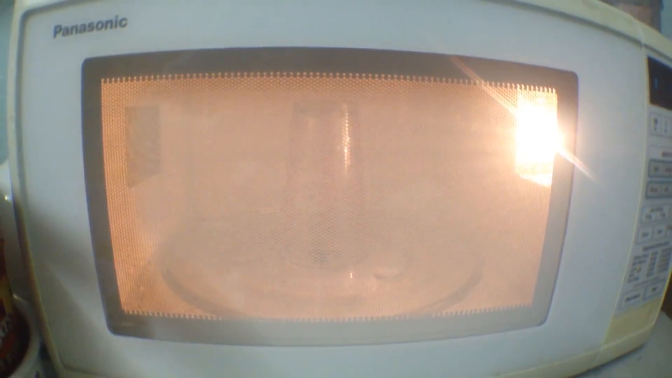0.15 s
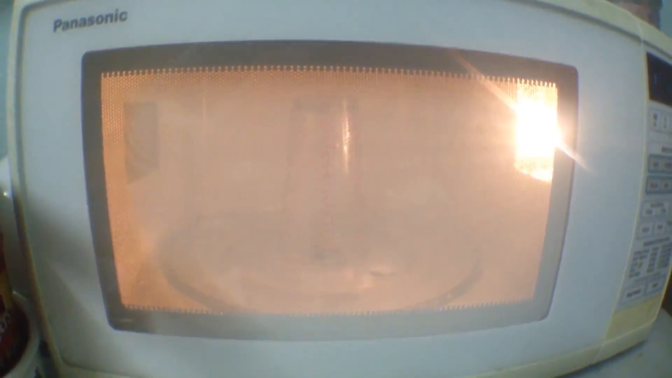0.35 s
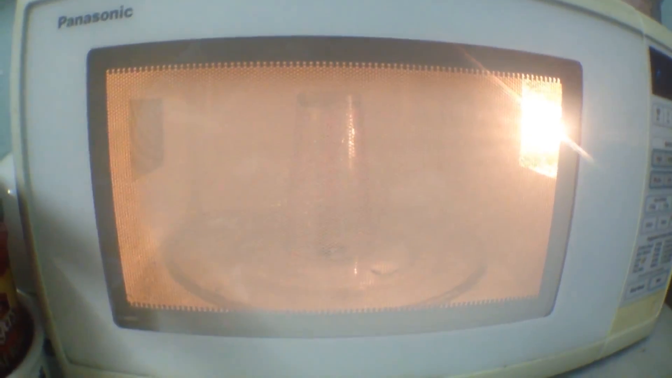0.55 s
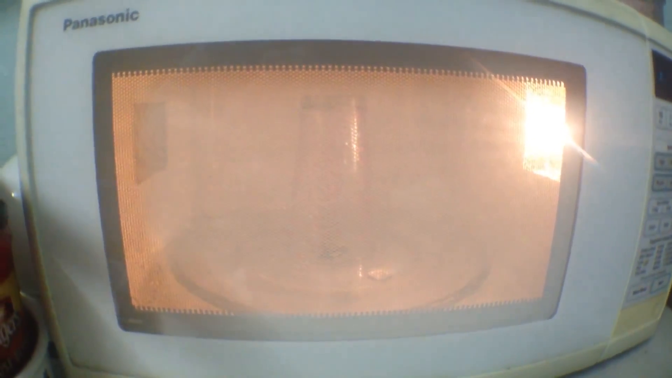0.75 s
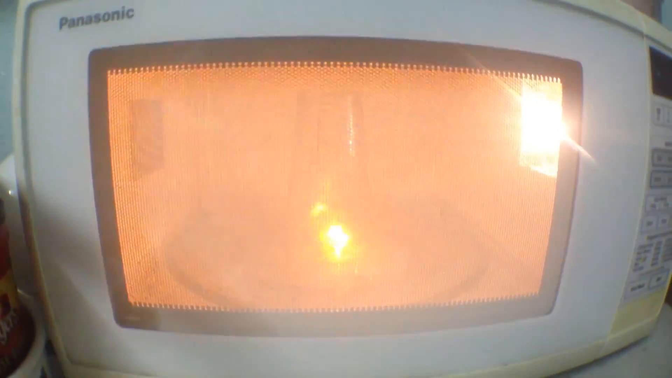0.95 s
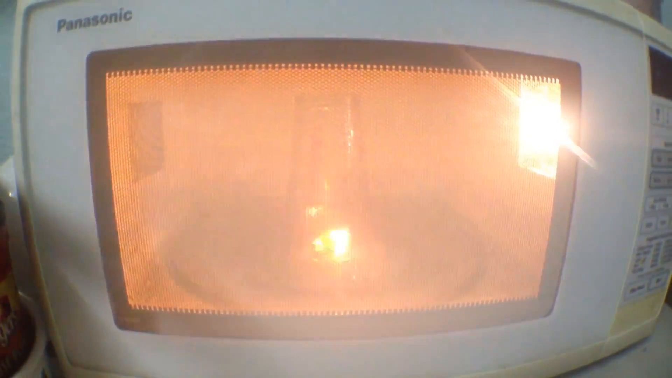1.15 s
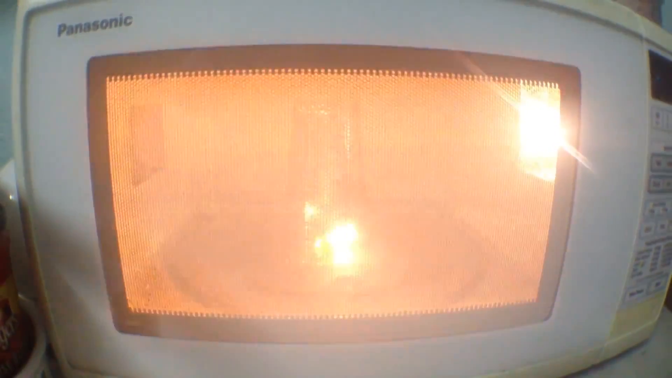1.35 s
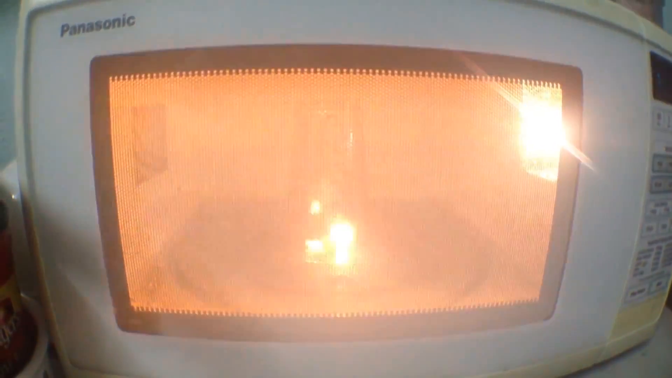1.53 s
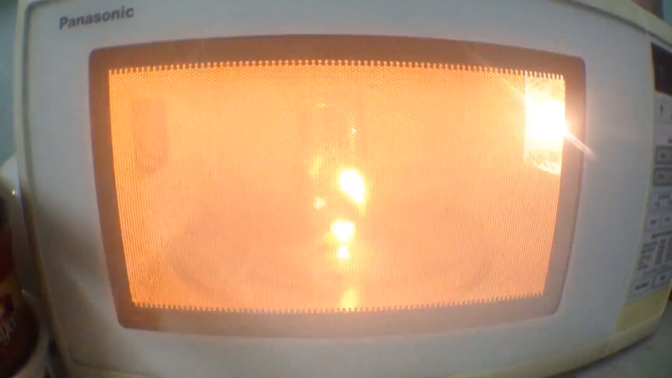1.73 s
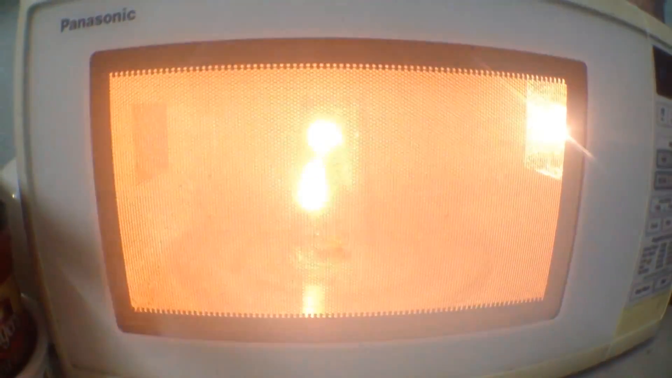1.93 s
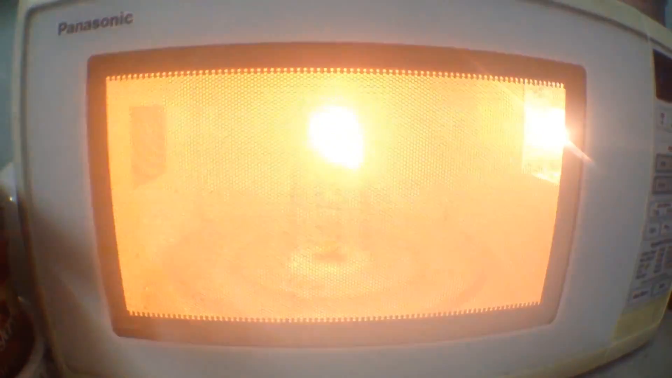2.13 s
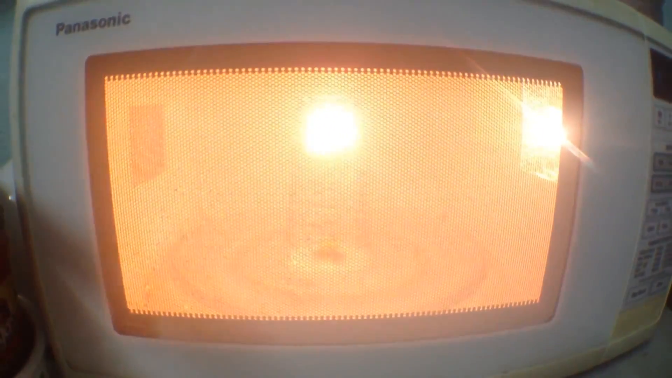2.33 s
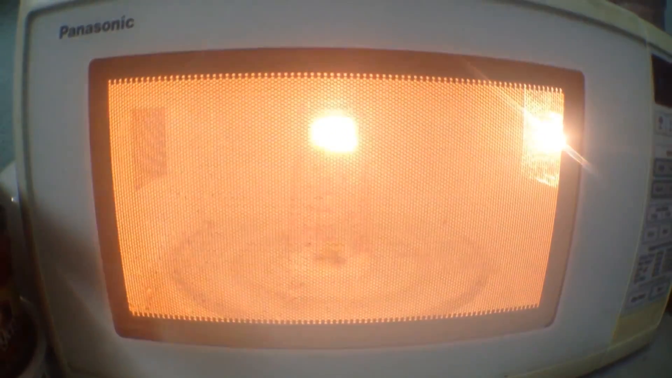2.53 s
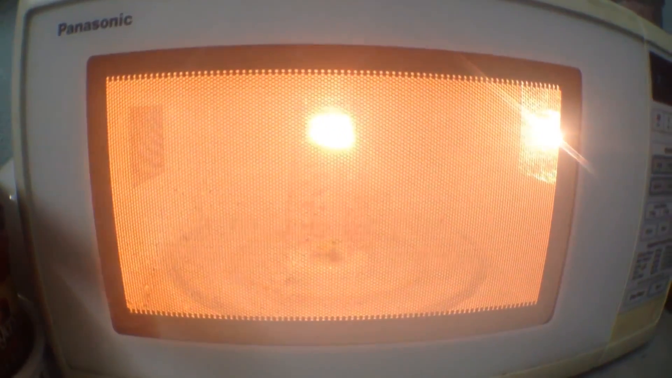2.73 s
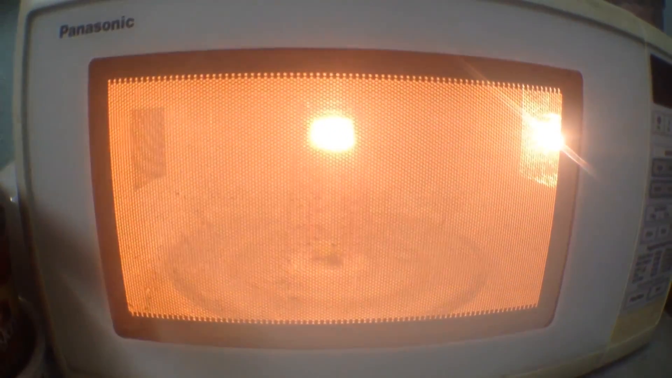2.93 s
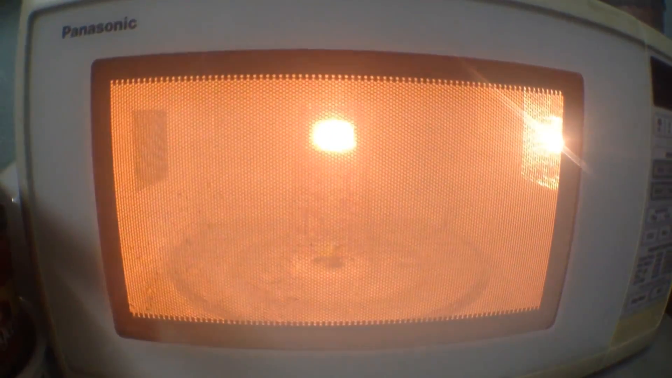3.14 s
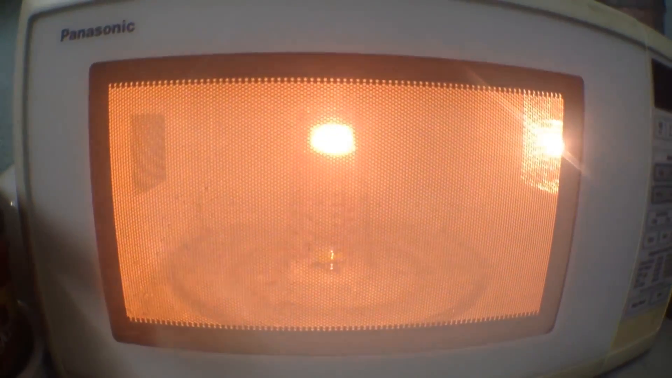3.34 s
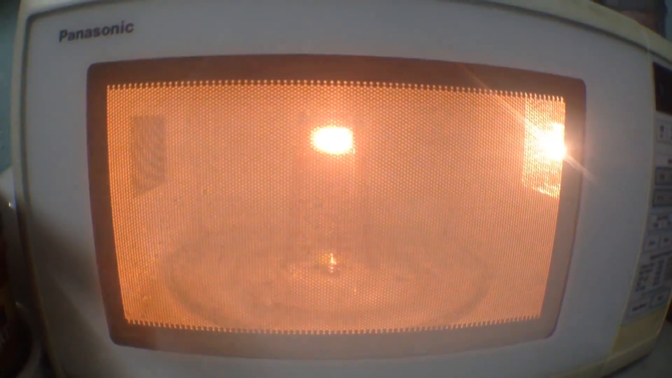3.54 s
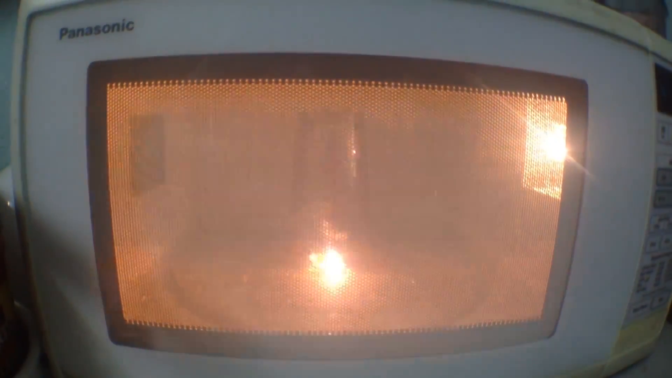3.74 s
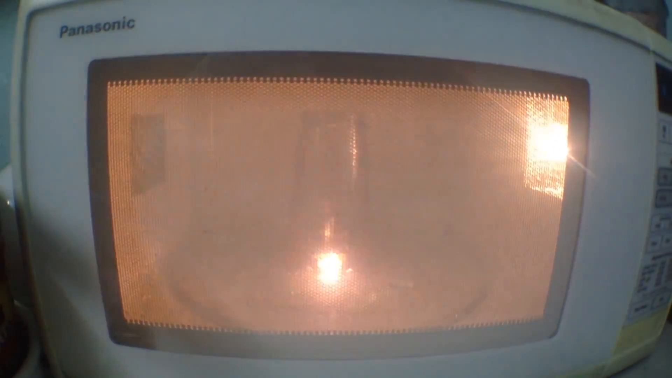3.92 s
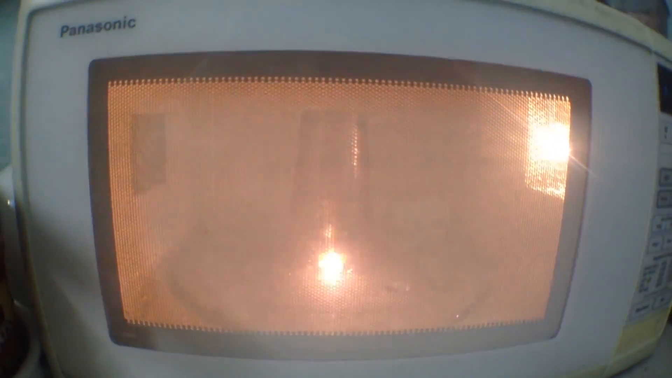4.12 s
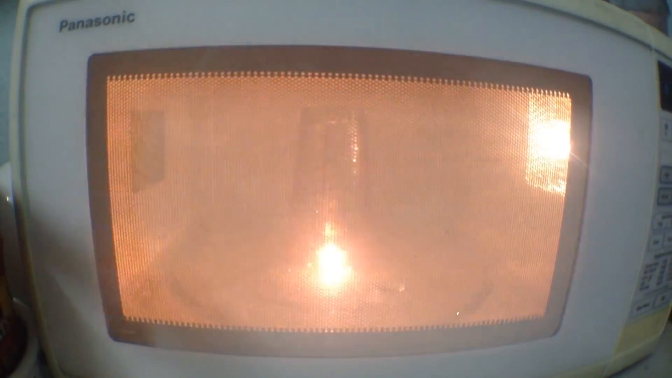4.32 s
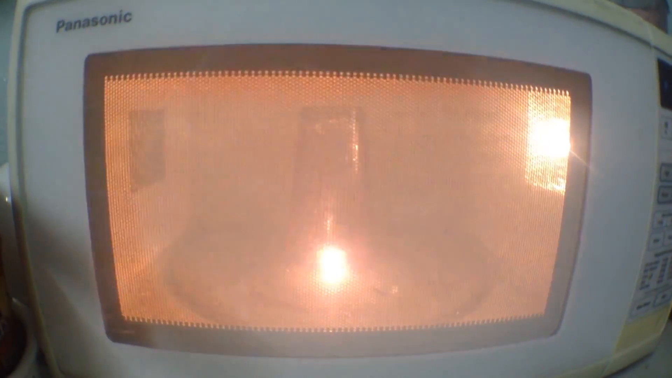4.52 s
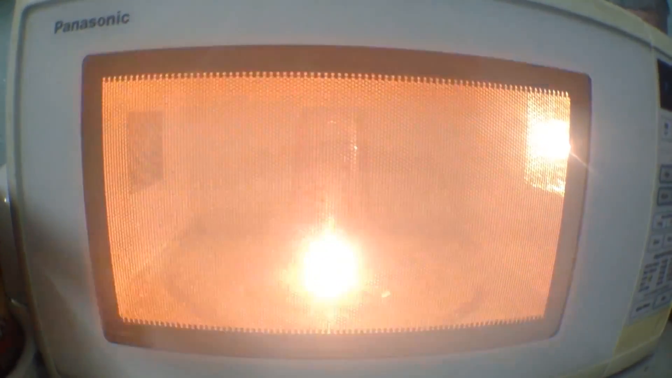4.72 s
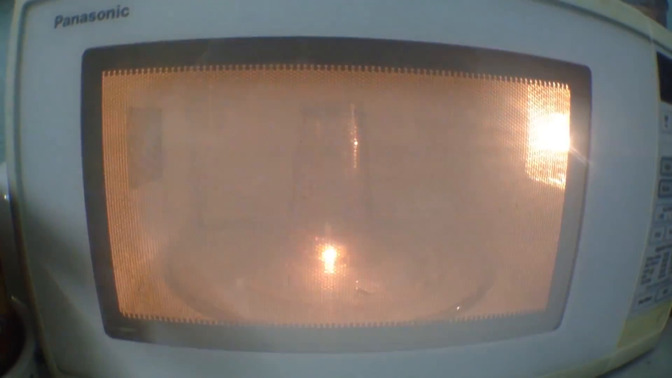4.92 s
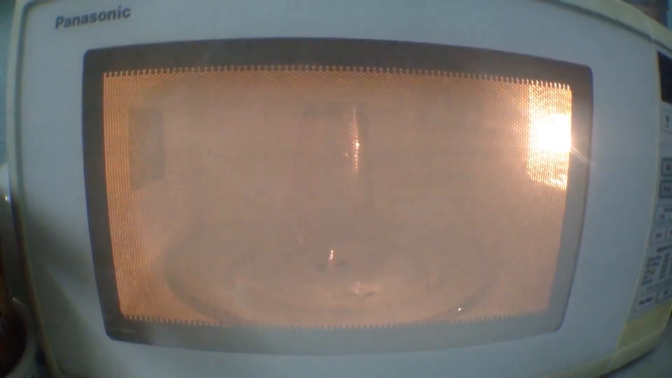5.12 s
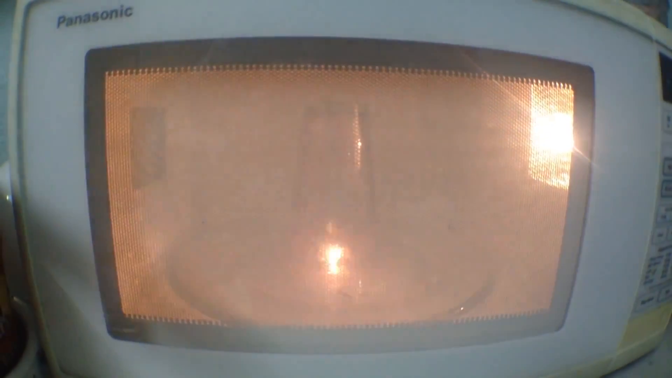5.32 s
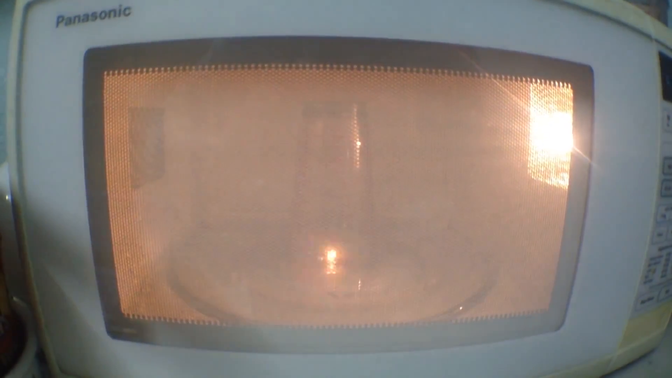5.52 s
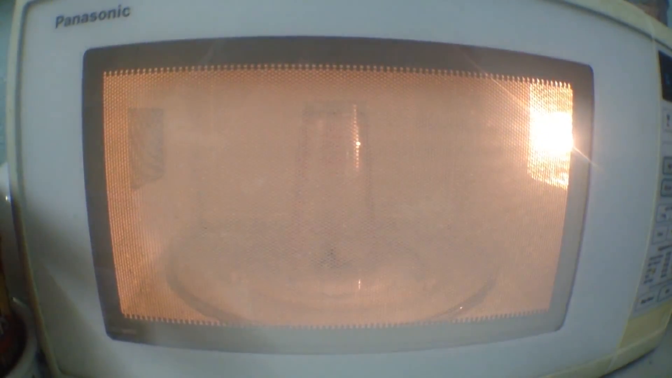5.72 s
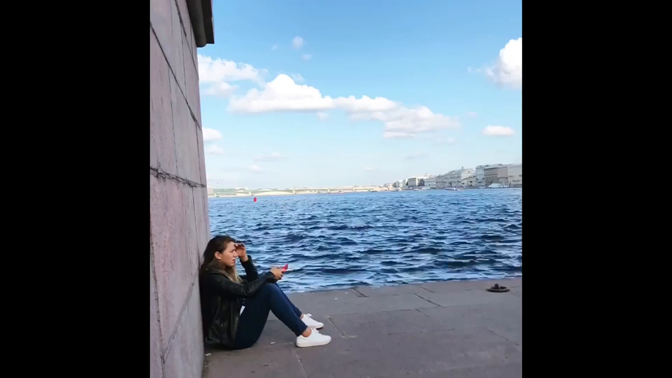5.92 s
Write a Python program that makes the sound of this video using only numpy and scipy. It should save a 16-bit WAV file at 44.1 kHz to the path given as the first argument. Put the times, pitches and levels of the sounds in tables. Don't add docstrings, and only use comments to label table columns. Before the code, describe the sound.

Close to a running microwave oven in a kitchen: low steady hum and fan air. Fruit inside sizzles faintly with two tiny pops, then a violent sputtering electric arc roars for over a second, ringing metal and glass. Hum alone returns, a second ragged arc burst follows, then hum again. An abrupt cut, a tiny silence, and low wind rumble by water ends it. Small camera microphone, slightly overloaded.

```python
import sys
import numpy as np
from scipy import signal
from scipy.fft import rfft, irfft
from scipy.io import wavfile
from scipy.ndimage import uniform_filter1d

SR = 44100
rng = np.random.default_rng(int(sys.argv[2]) if len(sys.argv) > 2 else 0)


def natural_amplitude(level_db):
    exponent = np.asarray(level_db, float) / 20
    return 10 ** exponent


def inscribe(sig):
    pcm = np.round(np.clip(np.atleast_2d(sig).T, -1, 1) * 32767)
    wavfile.write(sys.argv[1], SR, pcm.astype(np.int16))


N = 267422
T = np.arange(N) / SR

# (frequency [Hz], density [dB/Hz])
AIR_SPECTRUM = [(18, -76), (30, -47), (96, -21), (138, -9.5), (171, -10.5), (246, -15), (339, -7),
                (399, -11), (660, -12), (735, -18), (1190, -22), (1460, -15), (2200, -26.5), (2860, -45),
                (4840, -120)]
# (frequency [Hz], density [dB/Hz])
HISS_SPECTRUM = [(1700, -16), (2100, -27), (2550, -2), (3000, 2), (4450, 4), (5200, -7), (6600, -6.5),
                 (8600, -12), (9500, -22.5), (10600, -21), (11300, -16), (15000, -16)]
# (frequency [Hz], level re blade tone [dB], waver [dB])
TONES = [(168.3, 0, 1.2), (200, -3, 1.2), (336.6, -5, 2), (399, -17, 1.5)]
# (frequency [Hz], level re blade tone [dB], waver [dB])
CORE_TONE = (800.4, -15, 1.2)
# (time [s], level [dB], decay time [s])
JUICE_PUFF = (3.12, -64, .04)
# (time [s], air lowered [dB], tones lowered [dB])
GAIN_DROPS = [
    (2.15, 3.5, 3),
    (4.85, 2, 0.5),
]
# (frequency [Hz], width [Hz], level [dB])
SIZZLE_MODES = [(8630, 160, -2), (10680, 80, -13), (11350, 49, 1), (12300, 200, -9), (12670, 120, -10),
                (13240, 200, -16), (14000, 400, -14), (15050, 300, -15)]
# (time [s], peak level [dB])
SIZZLE_POPS = [
    (0.602, -42),
    (0.7028, -40.5),
]
# (time [s], burning time [s], roar level [dB], decay time [s])
STRIKES = [(0.901, 0.018, -12.5, 0.028), (0.998, 0.024, -14.5, 0.033), (1.057, 0.012, -15, 0.037),
           (1.106, 0.058, -17.5, .02), (1.166, 0.047, -12, 0.027), (1.215, 0.061, -14.5, 0.093),
           (1.3, 0.053, -18, 0.027), (1.361, 0.15, -13.5, .04), (1.513, 0.028, -11.5, 0.044),
           (1.581, 0.097, -14.5, 0.0095), (1.699, 0.053, -13, .03), (1.748, 0.039, -11, 0.036),
           (1.81, 0.066, -17.5, 0.059), (1.895, 0.13, -14, .03), (2.054, 0.033, -11.5, 0.026),
           (3.811, .02, -22.5, .02), (3.83, 0.027, -17.5, .02), (3.858, 0.038, -11.5, .02),
           (3.89, 0.012, -10, 0.042), (3.941, 0.17, -14, .02), (4.143, 0.0095, -13, 0.045),
           (4.215, 0.068, -16.5, .02), (4.288, .015, -14, 0.094), (4.352, 0.014, -15.5, 0.12),
           (4.45, 0.032, -13, 0.056), (4.574, 0.026, -11, .022), (4.674, 0.024, -24, .015),
           (4.717, 0.016, -13.5, .015), (4.741, 0.02, -16, 0.039), (4.791, 0.03, -23, 0.023)]
CAVITY_HZ = [400, 430, 622, 747, 784, 934, 1163, 1378, 1476, 1604, 1785, 2110, 2337, 2475, 2552, 3499]
# (width [Hz], level [dB], change once the turntable has moved [dB])
CAVITY_MODES = [(44.6, -12.5, -21), (26, -13, -13), (28, -11, -5), (16, -10.5, -0.5), (19.3, -3.5, 3),
                (15.9, -5, 1), (13, 2, -1.5), (21.3, 0.5, -1.5), (21.7, -10, 0.5), (25, -20.5, 9.5),
                (41.8, -8, 1), (27.4, -21, 3), (38.2, -10, -0.5), (24.8, -9.5, -4.5), (27.4, -12, 1.5),
                (28, -24, 10.5)]
# (frequency [Hz], width [Hz], level [dB])
DOOR_MODES = [(1381, 3.0, 4), (1017, 4, -19), (2340, 9, -14)]
# (frequency [Hz], width [Hz], level [dB])
MESH_MODES = [(3850, 50, -6), (3900, 40, -3), (3962, 45, -7), (4028, 45, -8), (4120, 120, -15)]
GLASS_HZ = [4834, 5103, 5523, 6262, 7202, 7267, 7644, 8527, 9097, 9797, 10712, 11200, 11714, 12241, 12403,
            12779, 14201, 14577, 15008, 15180]
# (width [Hz], level [dB])
GLASS_MODES = [(19.2, 0), (28, -4), (36.6, 2.5), (38.7, -1), (35, 1.5), (35, 0), (37, -1), (35.6, -10),
               (25, -18.5), (80, -16.5), (40.3, -35), (90, -31), (80, -16), (35, -16), (35, -31), (50, -67),
               (60, -27), (40, -27), (40, -23), (40, -34)]
# (frequency [Hz], density [dB/Hz])
ROAR_SPECTRUM = [(240, -19.5), (400, 1), (519, -10.5), (784, -5), (1070, -8.5), (1360, -2.5), (1590, -9.5),
                 (2400, -14.5), (3010, -15), (3970, -6), (4630, -14), (7440, -26), (12100, -59),
                 (13500, -55.5), (15500, -46)]
# (frequency [Hz], density [dB/Hz])
THUD_FIRST = [(24, -70), (40, -42), (64, -21), (156, -3), (311, -8.5), (429, 1), (520, -39), (680, -49),
              (1140, -120)]
# (frequency [Hz], density [dB/Hz])
THUD_SECOND = [(24, -72), (40, -35), (65, -28), (123, -9), (270, -0.5), (365, 2), (520, -50), (680, -21),
               (1140, -120)]
# (low edge [Hz], high edge [Hz])
SILENT_BANDS = [(9330, 9580), (10080, 10330), (12950, 13150), (13260, 14000)]
# (frequency [Hz], density [dB/Hz])
WIND_SPECTRUM = [(15, -52), (25, -35), (70, 1), (139, -13.5), (213, -2.5), (334, -26), (391, -20),
                 (496, -32), (567, -28.5), (1010, -30.5), (1590, -38), (2770, -43), (13900, -57.5)]
# (time [s], peak level [dB])
SPLASHES = [
    (5.9444, -45),
    (5.9599, -40),
    (6.0312, -35),
]
# (time [s], frequency [Hz], level [dB], decay time [s])
BUFFET = (5.829, 88, -22, .04)

MAINS_HZ, MAINS_PHASE_S = 49.76, 0.0033
AIR_DB, BLADE_DB, GAIN_RETURN_S = -45, -38.5, 1.6
SIZZLE_TOP_DB, SIZZLE_RISE_DB_PER_S, SIZZLE_TOP_S = -52.5, 19.5, 0.63
SIZZLE_SAG_DB_PER_S, SIZZLE_DRY_S, SIZZLE_FALL_DB_PER_S, SIZZLE_END_S = 50, 0.69, 200, 0.78
STRIKE_RISE_S, ARC_OUT_DB, MAINS_THROB_DB = 0.0017, -55, 1
THUD_DB, THUD_FOLLOWS, THUD_LAG_S = -14, 0.69, 0.009
KNOCK_DB = 40
TURNED = T > 3
LOW_CUT_HZ, TOP_HZ = 85, 15350
CUT_S, SILENCE_S, RETURN_S = 5.828, 5.849, 5.8995
WIND_AT_CUT_DB, WIND_DB = -26.5, -25.5


def rms_one(x):
    return x / np.sqrt(np.mean(x ** 2) + 1e-20)


def coloured(spectrum, source=None):
    if source is None:
        source = rng.standard_normal(N)
    hz, db = np.transpose(spectrum)
    bin_hz = np.maximum(np.arange(N // 2 + 1) * SR / N, 1)
    shape = natural_amplitude(np.interp(np.log(bin_hz), np.log(hz), db, left=-90, right=-90))
    return rms_one(irfft(rfft(source) * shape, N))


def drift(rate_hz):
    r = np.exp(-80 * np.pi * rate_hz / SR)
    white = rng.standard_normal(N // 40 + 2002)
    slow = signal.lfilter([1], [1, -2 * r, r * r], white)[2000:]
    return np.interp(np.arange(N) / 40, np.arange(len(slow)), rms_one(slow))


def resonances(x, modes):
    out = np.zeros(N)
    for k, (hz, width_hz, db) in enumerate(modes):
        r = np.exp(-np.pi * width_hz / SR)
        gain = (1 - r * r) / 2 * (-1) ** k
        poles = [1, -2 * r * np.cos(2 * np.pi * hz / SR), r * r]
        out += signal.lfilter([gain, 0, -gain], poles, natural_amplitude(db) * x + 1e-18)
    return out


def burst(time_s, db, decay_s):
    return natural_amplitude(db) * (T >= time_s) * np.exp(-np.clip(T - time_s, 0, 1) / decay_s)


def lowered(column):
    now_db = np.zeros(N)
    for row in GAIN_DROPS:
        creep = np.exp(-np.abs(T - row[0]) / GAIN_RETURN_S)
        now_db = np.where(T > row[0], row[column] * creep, now_db)
    return now_db


def oven():
    air_db = AIR_DB - lowered(column=1)
    tone_db = BLADE_DB - lowered(column=2)
    air = coloured(AIR_SPECTRUM) * natural_amplitude(air_db + 5 + 0.61 * drift(14))
    hiss = coloured(HISS_SPECTRUM) * natural_amplitude(air_db - 10 + 0.44 * drift(24))
    tones = np.zeros(N)
    for hz, db, waver_db in TONES + [CORE_TONE]:
        phase = 2 * np.pi * hz * T + 0.19 * drift(2.6)
        tones += natural_amplitude(db + waver_db * drift(8.7)) * np.sin(phase)
    steam = coloured([(4500, -25), (6500, 0), (8000, -3), (10000, -25)])
    return air + hiss + burst(*JUICE_PUFF) * steam + tones * natural_amplitude(tone_db + 1.5)


def sizzle():
    level_db = SIZZLE_TOP_DB - SIZZLE_RISE_DB_PER_S * np.maximum(SIZZLE_TOP_S - T, 0)
    level_db -= SIZZLE_SAG_DB_PER_S * np.maximum(T - SIZZLE_TOP_S, 0)
    level_db -= SIZZLE_FALL_DB_PER_S * np.maximum(T - SIZZLE_DRY_S, 0)
    cycle = MAINS_HZ * (T - MAINS_PHASE_S)
    puffs = (0.5 + 0.5 * np.cos(2 * np.pi * cycle)) ** 0.73
    force = (T < SIZZLE_END_S) * natural_amplitude(level_db - 1) * (0.25 + puffs * natural_amplitude(2 * drift(15)))
    force = force + sum(burst(time_s, db - 6, 0.0063) for time_s, db in SIZZLE_POPS)
    white = rng.standard_normal(N)
    buzz = natural_amplitude(-72.5) * puffs * white[(cycle % 1 * SR / MAINS_HZ).astype(int)]
    return resonances(force * white + buzz, SIZZLE_MODES) / np.std(resonances(white, SIZZLE_MODES))


def strike(time_s, burning_s, db, decay_s):
    rise = np.clip((T - time_s) / STRIKE_RISE_S, 0, 1)
    return natural_amplitude(db) * rise * np.exp(-np.clip(T - time_s - burning_s, 0, 1) / decay_s)


def plasma_sparks():
    sputter = natural_amplitude(2.2 * drift(90))
    cracks = (rng.random(N) < 70 / SR) * rng.normal(0, 9, N)
    spikiness = natural_amplitude(2.2 * np.minimum(rng.exponential(1, N), 6))
    return rms_one(sputter * rng.standard_normal(N) * spikiness + cracks)


def door_knocks():
    knocks = np.zeros(N)
    knocks[[round(row[0] * SR) for row in STRIKES]] = natural_amplitude([row[2] + KNOCK_DB for row in STRIKES])
    return uniform_filter1d(knocks, size=9)


def wall_thud(power):
    keep = np.exp(-1 / (THUD_LAG_S * SR))
    push = signal.lfilter([1 - keep], [1, -keep], power ** (THUD_FOLLOWS / 2) + 1e-18)
    thud = np.where(TURNED, coloured(THUD_SECOND), coloured(THUD_FIRST))
    return natural_amplitude(THUD_DB) * push * thud * natural_amplitude(-4)


def evened(x, force, share):
    stored = signal.lfilter([1 / 260], [1, 1 / 260 - 1], force ** 2)
    heard = uniform_filter1d(x ** 2, size=800) + 1e-9
    ratio = heard / (uniform_filter1d(stored, size=800) + 1e-9)
    lit = uniform_filter1d(1. * (force > 0), size=400)
    return x * (np.median(ratio[force > 0]) / ratio) ** (share * lit / 2)


def kitchen(x, t60_s=0.28):
    age_s = np.arange(int(0.5 * SR)) / SR
    tail = rng.standard_normal(len(age_s)) * natural_amplitude(-60 * age_s / t60_s) * (age_s > 0.006)
    tail = signal.lfilter([0.3], [1, -0.65], tail)
    return signal.fftconvolve(x, tail / np.sqrt(np.sum(tail ** 2)))[:N]


def arc():
    power = sum(strike(*row) ** 2 for row in STRIKES)
    power = power * (power > natural_amplitude(ARC_OUT_DB) ** 2)
    throb_db = MAINS_THROB_DB * np.cos(2 * np.pi * MAINS_HZ * (T - MAINS_PHASE_S))
    force = np.sqrt(power) * natural_amplitude(drift(21.7) + throb_db)
    sparks = plasma_sparks()
    walls = [(hz, width_hz, db + TURNED * change_db)
             for hz, (width_hz, db, change_db) in zip(CAVITY_HZ, CAVITY_MODES)]
    panes = [(hz, *mode) for hz, mode in zip(GLASS_HZ, GLASS_MODES)]
    cavity = resonances(force * sparks, walls) * natural_amplitude(18)
    glass = resonances(force * sparks, panes) * natural_amplitude(-1)
    door = resonances(force * np.roll(sparks, 900) + door_knocks(), DOOR_MODES) * natural_amplitude(17.5 - 10 * TURNED)
    mesh = resonances(force * np.roll(sparks, 1900), MESH_MODES) * natural_amplitude(18)
    between = force * coloured(ROAR_SPECTRUM, np.roll(sparks, 4000)) * natural_amplitude(-11)
    roar = evened(cavity + mesh + glass + between, force, share=0.22)
    direct = roar + door + wall_thud(power)
    return direct + natural_amplitude(-16) * kitchen(direct)


def small_camera(x):
    low_cut = signal.butter(2, LOW_CUT_HZ, "high", fs=SR, output="sos")
    x = signal.sosfilt(low_cut, 0.92 * np.tanh(x / 0.87))
    spectrum, hz = rfft(x), np.arange(N // 2 + 1) * SR / N
    weak = sum((hz > low) & (hz < high) for low, high in SILENT_BANDS)
    loud = uniform_filter1d(x ** 2, size=2048) > natural_amplitude(-27) ** 2
    loud = uniform_filter1d(1. * loud, size=1024)
    return irfft(spectrum * (hz < TOP_HZ), N) - loud * irfft(spectrum * weak, N)


def waterside():
    level_db = np.where(T < RETURN_S, WIND_AT_CUT_DB, WIND_DB)
    low_cut = signal.butter(2, 55, "high", fs=SR, output="sos")
    rumble = signal.sosfilt(low_cut, coloured(WIND_SPECTRUM))
    spray = coloured([(1500, -20), (5000, -2), (13000, -6), (13900, -40)])
    splashes = spray * sum(burst(time_s, db - 9, 0.005) for time_s, db in SPLASHES)
    time_s, hz, db, decay_s = BUFFET
    swell = uniform_filter1d(burst(time_s, db, decay_s), size=60, origin=29)
    gust = swell * np.cos(2 * np.pi * hz * (T - time_s))
    return rumble * natural_amplitude(level_db + 0.65 * drift(18)) + splashes + gust


def scene():
    indoors = small_camera(oven() + sizzle() + arc())
    fade = np.clip((SILENCE_S - T) / 0.011, 0, 1)
    cut = np.clip((T - CUT_S) / 0.00012, 0, 1)
    gate = np.where(T < RETURN_S, fade, 1)
    top_cut = signal.cheby2(14, 50, 14600, fs=SR, output="sos")
    outdoors = signal.sosfilt(top_cut, waterside() * gate) * cut
    return (indoors * (1 - cut) + outdoors)[None]


def low_pass(x):
    return signal.sosfilt(signal.butter(12, 15710, fs=SR, output="sos"), x)


def record(dry):
    return low_pass(dry)


dry = scene()
out = record(dry)
inscribe(out)
```